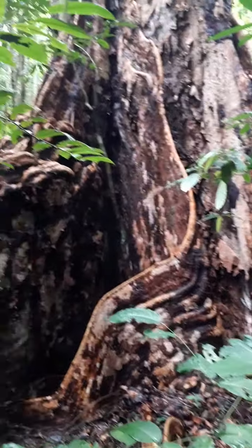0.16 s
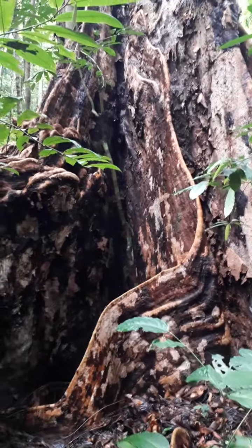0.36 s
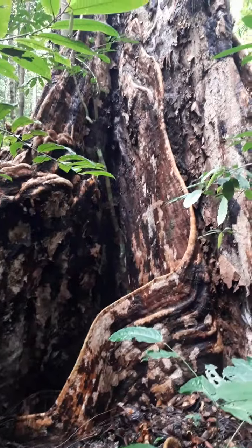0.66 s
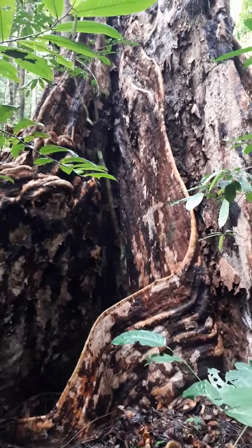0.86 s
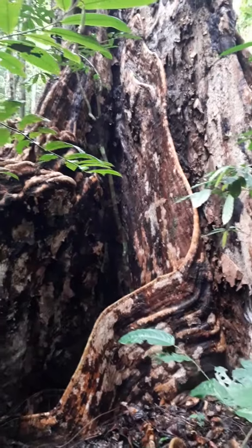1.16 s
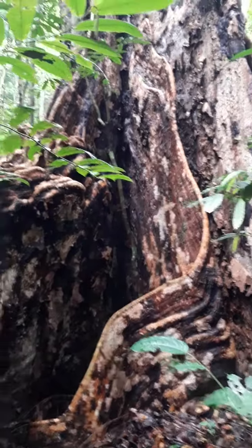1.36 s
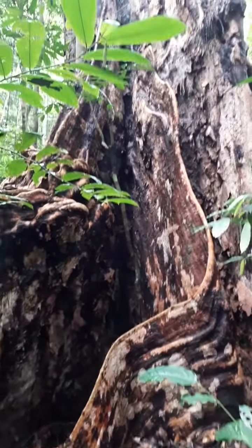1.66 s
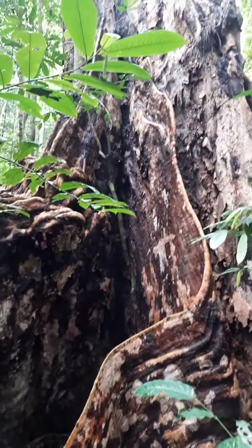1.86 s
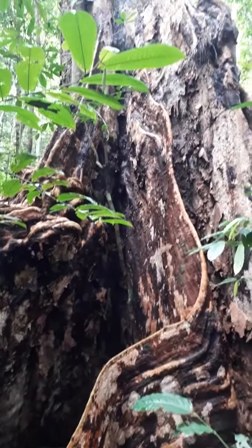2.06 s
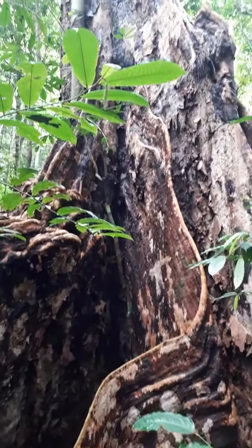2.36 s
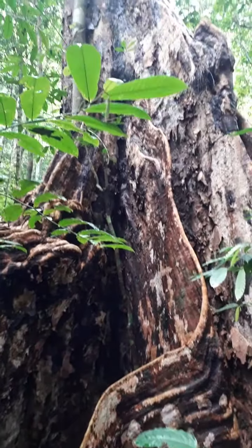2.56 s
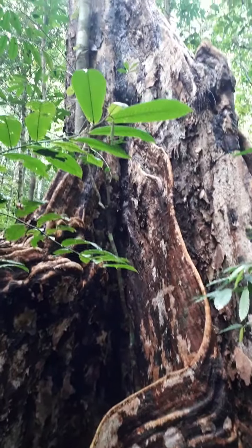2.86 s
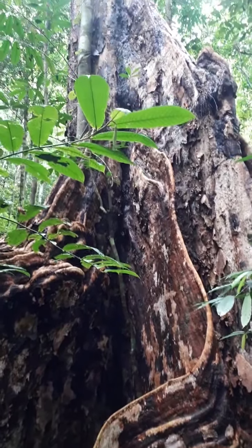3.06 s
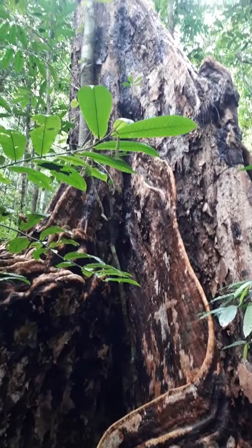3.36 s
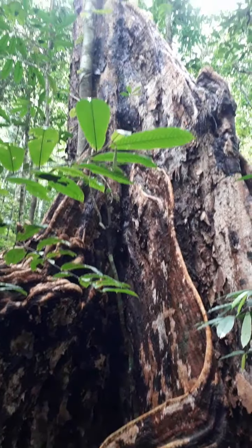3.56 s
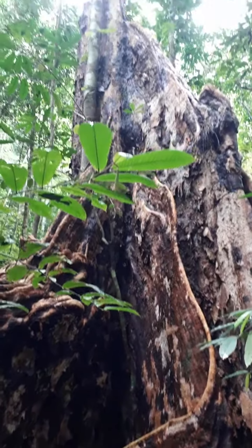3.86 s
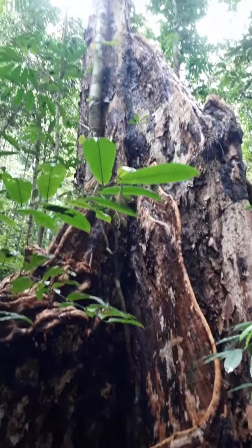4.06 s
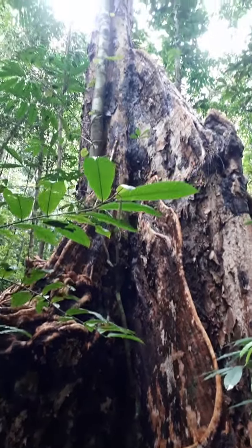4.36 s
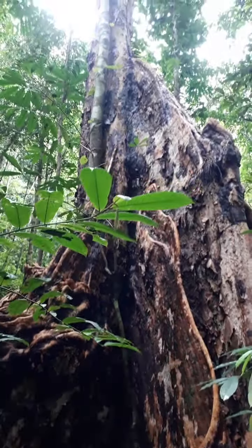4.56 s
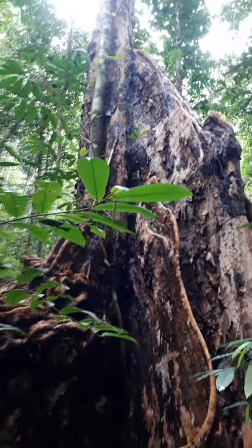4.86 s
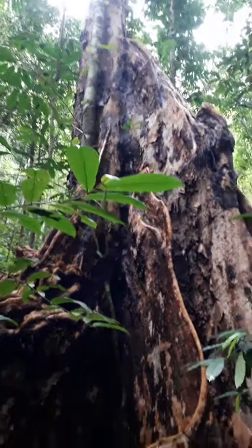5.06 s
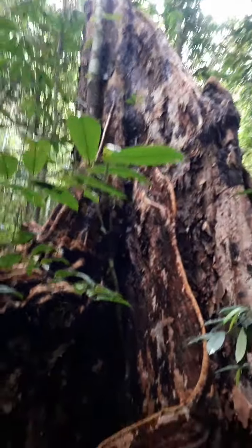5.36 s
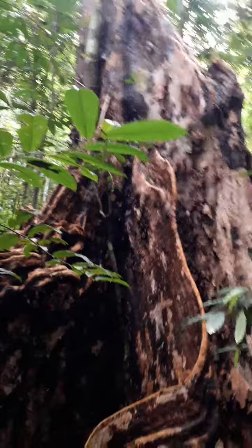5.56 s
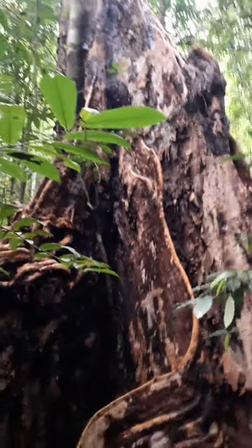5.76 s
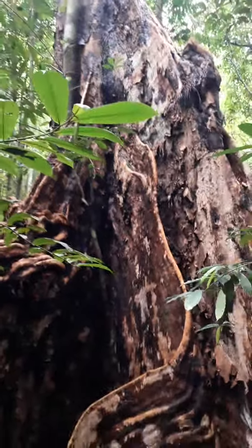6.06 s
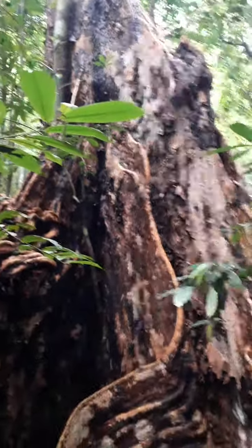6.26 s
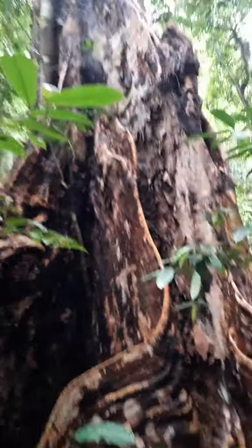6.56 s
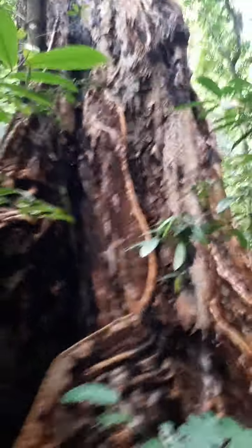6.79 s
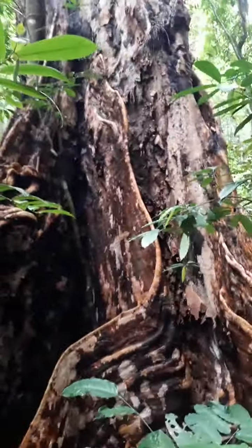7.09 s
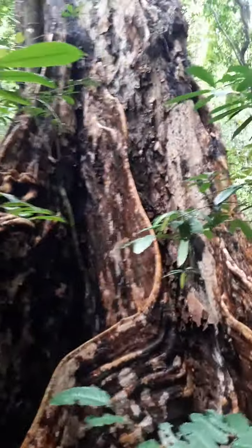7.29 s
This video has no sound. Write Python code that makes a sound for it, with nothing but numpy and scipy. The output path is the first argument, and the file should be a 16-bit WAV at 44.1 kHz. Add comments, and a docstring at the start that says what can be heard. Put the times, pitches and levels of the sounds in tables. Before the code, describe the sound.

In a tropical forest by day, a near cricket trills in rapid buzzing bouts over two shrill bands of distant insects. Close to the microphone, twigs snap sharply in the first two seconds and again near four; a quieter middle follows. Toward the end feet crunch dry, damp leaf litter and a stick breaks loudly. Thin falling chirps sit behind. The picture is almost mono.

```python
"""A near cricket trills in bouts: short wing-stroke notes swell, hold and break off in a tropical forest by day.
Feet shift in leaf litter: clumped fractures make the crackle, filtered bursts the twigs, resonances one stick.
Falling chirps, peeps and dry rasps sit behind, over two far insect bands and air made of coloured noise.
Decaying noise tails stand for scatter from trunks and leaves; two close ports give a nearly mono picture."""
import sys
import numpy as np
from scipy import signal
from scipy.fft import rfft, irfft, next_fast_len
from scipy.io import wavfile

SR = 44100
rng = np.random.default_rng(int(sys.argv[2]) if len(sys.argv) > 2 else 0)


def store_pcm(level_fs):
    """Save levels as 16-bit WAV."""
    pcm = np.round(np.clip(level_fs, -1, 1) * 32767).astype(np.int16)
    wavfile.write(sys.argv[1], SR, np.atleast_2d(pcm).T)


N = 327663
TIME = np.arange(N) / SR

# Bouts of the near cricket. Each row: first stroke in seconds, end in seconds, swell in seconds,
# relative level in dB.
CRICKET_BOUTS = [(-.272, .27, 0.08, -65), (0.773, 2.446, 0.092, -61), (2.797, 3.63, .5, -57.5),
                 (3.699, 4.745, 0.07, -57.5), (4.835, 5.03, .06, -61.5), (5.259, 5.818, 0.19, -55.5),
                 (6.214, 6.56, .2, -59), (6.856, 7.28, 0.17, -58)]
STROKES_PER_S, BREAK_OFF_S = 36.52, .03
IDLE_DB = -69   # relative level of the soft wing brushing between bouts

# A foot presses on the litter. Each row: fullest weight in seconds, press time in seconds,
# release time in seconds, relative level of the damp underlayer in dB, of the dry leaves in dB.
FOOT_PRESSES = [(.02, .05, 0.15, -76.5, -71.5), (.23, .07, 0.059, -74, -74), (5.22, 0.045, 0.046, -75, -82),
                (5.5, .06, 0.069, -73, -67.5), (5.6, .055, .065, -73, -56.5),
                (5.645, 0.024, .035, -66.5, -64.5), (6.275, 0.037, .06, -62.5, -60),
                (6.44, .06, 0.069, -68.5, -62.5), (6.585, 0.023, 0.033, -58, -70),
                (6.8, 0.17, 0.058, -70, -66), (7.19, 0.1, 0.15, -73.5, -63),
                (7.33, 0.061, 0.08, -68, -68.5)]
# Colour of the damp layer under the leaves. Each row: frequency in Hz, relative level in dB per Hz.
UNDERLAYER_SPECTRUM = [(60, -15.5), (200, -10.5), (450, -4.5), (750, -1), (1250, 1), (1700, -16),
                       (2600, -24)]
# Colour of the sliding dry leaves. Each row: frequency in Hz, relative level in dB per Hz.
LEAF_SPECTRUM = [(700, -18), (1400, -4), (2000, -6.5), (2700, -6), (3700, -1), (6000, -8.5), (8700, 1.5),
                 (10500, -10), (12700, -3.5), (16000, -12.5)]

# Twigs and dry leaves snapping. Each row: start in seconds, tearing time scale in seconds, body in Hz,
# body level in dB, crack in Hz, crack level in dB, splinter level in dB.
TWIG_SNAPS = [(0.0284, 0.0033, 1990, -72, 5070, -56, -68), (.109, 0.0037, 1050, -72, 5660, -56, -72),
              (0.2107, 0.0028, 1380, -64.5, 6940, -51, -62), (.7371, .0012, 1260, -79, 5360, -62, -83),
              (0.7982, 0.0042, 1050, -68.5, 1190, -68, -90), (.985, 0.0028, 1100, -55.5, 7300, -44, -51.5),
              (1.149, 0.0063, 684, -63, 3000, -53.5, -55), (1.1525, 0.0047, 1000, -70, 6600, -46, -57),
              (1.585, 0.003, 1360, -67.5, 4470, -75.5, -74), (1.79, 0.0031, 1050, -49, 6550, -40, -60),
              (1.7931, 0.0023, 1800, -51, 5800, -49, -60), (2.122, .002, 1070, -66, 7300, -54, -64),
              (2.1488, 0.0021, 1070, -67, 6200, -54.5, -63), (3.756, 0.0033, 1870, -72, 3000, -87, -91),
              (3.849, 0.0012, 2200, -56, 5400, -46, -66), (3.8526, 0.0037, 840, -54, 5400, -40, -51),
              (3.867, 0.0035, 870, -58, 4650, -53, -56), (3.879, .0029, 915, -60.5, 4900, -53, -59),
              (6.2804, 0.0028, 1100, -57, 5200, -64, -63), (6.3825, .0065, 3100, -50, 6000, -47.5, -47),
              (6.539, 0.0021, 836, -59, 5350, -53, -60.5), (6.731, 0.0063, 1476, -43.5, 6270, -37.5, -44),
              (6.7442, 0.0039, 1560, -51.5, 4880, -46, -51), (7.1294, 0.001, 1755, -54, 4350, -60, -57),
              (7.161, .0022, 2000, -48, 5400, -42.5, -44), (7.297, .0012, 1890, -51.5, 990, -56.5, -75)]
SNAP_ECHO_DB = -9.5   # level of the burst spread by the undergrowth, relative to the snap

# Resonances of the breaking stick. Each row: frequency in Hz, width in Hz, relative level in dB.
STICK_RESONANCES = [(270, 370, -20.5), (1584, 530, -5.5), (2950, 310, -12.5), (3800, 244, -15),
                    (5190, 900, -0.5), (8000, 1600, -12), (10500, 440, -26.5), (15200, 700, -21.5)]
STICK_S, STICK_DB = 6.7368, 19   # start in seconds, drive in dB
TAP_S, TAP_DB = 4.8801, -4.5   # tap on the microphone's housing: start in seconds, drive in dB
# Soft thumps. Each row: start in seconds, drive in dB, frequency in Hz, 60 dB decay in seconds.
SOFT_THUMPS = [(.915, -62.5, 110, 0.051), (4.869, -51, 139, 0.057), (4.8872, -40, 380, 0.0061),
               (4.889, -35, 142, 0.032), (5.652, -60, 125, .05), (6.714, -56, 169.4, 0.028)]

# Thin falling chirps. Each row: start in seconds, starting pitch in Hz, relative level in dB.
CANOPY_CHIRPS = [(.51, 13300, -77), (.83, 14900, -73), (.87, 13700, -67), (1.41, 13700, -69),
                 (2.63, 14200, -71), (2.88, 14150, -72), (3.2, 14200, -70), (3.41, 13900, -61),
                 (3.59, 14200, -71), (3.97, 14500, -67.5), (4.44, 14400, -71), (4.85, 14700, -69),
                 (5.15, 14200, -69.5), (5.21, 13200, -72), (5.37, 15400, -68), (5.92, 13650, -68)]
CHIRP_S, CHIRP_FALL_HZ = .048, 420
PEEP_START_S, PEEP_EVERY_S = 4, 0.24
PEEP_S, PEEP_HZ, PEEP_FALL_HZ, PEEP_DB = .04, 7600, 159, -69   # level is the centre of a random spread
# Faint level calls from deep in the forest. Each row: start in seconds, pitch in Hz, relative level in dB.
DEEP_CALLS = [(.04, 1315, -75), (.1, 3560, -73), (2.12, 1345, -81.5), (3.25, 3730, -77), (5.8, 3540, -77)]
DEEP_CALL_S = 0.19

# Dry insect rasps. Each row: start in seconds, length in seconds, relative level in dB, direct share from 0 to 1.
INSECT_RASPS = [(1.063, 0.1, -62, 0.4), (2.694, 0.051, -45.5, 1.0), (4.879, 0.038, -49.5, 0.45)]
# Colouring of the rasp's tooth clicks. Each row: frequency in Hz, gain in dB.
RASP_COLOUR = [(5500, -30), (7000, -17), (8300, -3.5), (9200, -1), (10300, -12.5), (11500, -21),
               (14000, -22), (16000, -39)]

# Song of the lower far insects. Each row: frequency in Hz, relative level in dB per Hz.
LOW_CHOIR_SPECTRUM = [(4200, -36), (4620, -26.5), (4780, -13), (5250, -3), (5400, -3), (5550, -2.5),
                      (5900, -9.5), (6400, -29.5), (6800, -44.5)]
LOW_CHOIR_DB, LOW_CHOIR_DB_PER_S, LOW_CHOIR_SWAY_DB = -62.3, -.3, 0.37   # sinks slowly
# Song of the higher far insects. Each row: frequency in Hz, relative level in dB per Hz.
HIGH_CHOIR_SPECTRUM = [(6600, -27.5), (7100, -8.5), (7450, -9.5), (7800, -2), (8000, -6), (8300, -16),
                       (8800, -13.5), (9300, -33.5)]
# Slow level course of the high choir. Each row: time in seconds, relative level in dB.
HIGH_CHOIR_COURSE = [(0, -74), (.45, -68), (.9, -75), (1.9, -66.5), (2.6, -73.5), (3.0, -68.5), (4.2, -73),
                     (4.9, -70), (5.5, -70.5), (6.5, -67), (7.43, -72)]
WHINE_DB, WHINE_SWAY_DB, WHINE_SWAY_HZ = -77, 3, 2.5   # a far cricket on one thin note

# Forest background noise. Each row: frequency in Hz, relative level in dB per Hz.
AIR_SPECTRUM = [(25, -12.5), (55, -2.5), (90, 2.5), (130, 5), (200, -3.5), (350, -7), (700, -10),
                (1300, -10), (2400, -13), (4200, -10.5), (9500, -18.5), (12500, -12.5), (14000, -11.5),
                (16000, -10.5)]
# Decay of the forest's tail at a stretch of 1. Each row: frequency in Hz, 60 dB decay in seconds.
FOREST_DECAY = [(100, 0.22), (600, 0.4), (1400, 0.34), (4000, 0.58), (9000, 0.34), (16000, 0.46)]
# Noise that differs between the ports. Each row: frequency in Hz, relative level in dB per Hz.
PORT_HISS_SPECTRUM = [(25, 6.5), (120, 10), (220, 1.5), (1200, -1), (2600, -9), (5000, 0.5), (8500, -4.5),
                      (13000, 0.5), (16000, -0.5)]
PORT_HISS_DB, PORT_MISMATCH_DB = -81, -55.5
CUTOFF_HZ = 15900


def cricket():
    """The near cricket restarts its wing beat with every bout and presses harder as the bout swells."""
    first_s, effort = np.zeros(N), np.zeros(N)
    for start, end, swell_s, db in CRICKET_BOUTS:
        first_s[TIME >= start - .5 / STROKES_PER_S] = start
        swell = np.sqrt(np.clip((TIME - start) / swell_s, 0, 1))
        break_off = np.clip((end - TIME) / BREAK_OFF_S, 0, 1)
        effort += from_db(db) * swell * break_off
    song = from_db(-3.6) * np.hypot(effort, from_db(IDLE_DB)) * trill(first_s, STROKES_PER_S)
    return song + from_db(-11) * forest(song, stretch=1.2)


def trill(first_s, strokes_per_s, wing_hz=5400, glide_hz=330, stroke_width=0.12, rasp_db=-10.5):
    """Each wing stroke is a short note that starts sharp and settles near the wing's resonance; rms 1."""
    count = (TIME - first_s) * strokes_per_s
    stroke = np.round(count).astype(int)
    within = count - stroke   # -0.5 to 0.5 of a stroke
    strength = from_db(rng.normal(0, 1.3, N // 500))[stroke]
    glide = glide_hz * np.clip(-within / stroke_width - .4, 0, 3)
    pitch = wing_hz + glide + 25 * drift(59.0)
    note = np.sin(2 * np.pi * np.cumsum(pitch) / SR) * np.exp(-.5 * (within / stroke_width) ** 2)
    # the scraper bites the file just before mid-stroke
    bite = np.exp(-.5 * ((within + 0.13) / 0.037) ** 2)
    catch = rms_one(band(rng.standard_normal(N), 4850, 6200, order=4)) * bite
    return rms_one(strength * (note + from_db(rasp_db) * catch))


def footsteps():
    """A sole presses dry leaves into the damp layer under them; they slide with a swish and a few crack."""
    damp, dry = np.zeros(N), np.zeros(N)
    for s, press_s, release_s, damp_db, dry_db in FOOT_PRESSES:
        unloading = np.where(TIME < s, ((s - TIME) / press_s) ** 2, (TIME - s) / release_s)
        weight = np.exp(-unloading.clip(0, 30))
        damp = np.hypot(damp, from_db(damp_db) * weight)
        dry = np.hypot(dry, from_db(dry_db) * weight)
    wet_grains = colour(crackle(per_s=2400, size_db=3.0, clump_db=3.0), UNDERLAYER_SPECTRUM)
    press = from_db(-.5) * damp * rms_one(wet_grains)
    leaf_grains = colour(crackle(per_s=7000, size_db=3.8, clump_db=2.3), LEAF_SPECTRUM)
    swish = from_db(3.5) * rms_one(leaf_grains)
    cracks = from_db(-2.0) * rms_one(band(crackle(per_s=200, size_db=3.3, clump_db=0.5), 1400, 6500))
    litter = press + dry * (swish + cracks)
    return litter + from_db(-13.0) * forest(litter, stretch=1.1)


def crackle(per_s, size_db, clump_db):
    """Tiny fractures at random instants, with uneven sizes that grow and shrink in clumps."""
    born = rng.random(N) < per_s / SR
    own_db = size_db * np.minimum(rng.exponential(1, N), 4)
    shared_db = clump_db * np.clip(drift(64), -2, 2)
    return born * from_db(own_db + shared_db) * rng.choice([-1, 1], N)


def snaps(body_width=1.46, crack_width=1.38, scatter_s=0.012, bending_db=-6.5):
    """Tearing fibres sound the body, a sharp crack and fine splinters; undergrowth spreads each burst."""
    direct, scattered = np.zeros(N), np.zeros(N)
    for s, tear_s, body_hz, body_db, crack_hz, crack_db, splinter_db in TWIG_SNAPS:
        parts = [(body_hz / body_width, body_hz * body_width, body_db),
                 (crack_hz / crack_width, crack_hz * crack_width, crack_db),
                 (9500, 16000, splinter_db),
                 (2.0 * body_hz, 3.7 * body_hz, body_db + bending_db)]   # the body's next bending mode
        for out, length, path_db in [(direct, tear_s, 0), (scattered, scatter_s, SNAP_ECHO_DB)]:
            for low_hz, high_hz, db in parts:
                # each part is driven by fibres of its own; its energy equals 10 ms at rms 1 before the level
                part = band(burst(length, uneven_db=2.5), low_hz, high_hz)
                add(out, s, from_db(db + path_db) * part * np.sqrt(SR / 100) / np.linalg.norm(part))
    return direct + from_db(-3) * scattered + from_db(-2.0) * forest(scattered, stretch=0.83)


def burst(length, uneven_db):
    """A quick run of tiny uneven fractures that swells and dies."""
    t = TIME[:SR // 12]
    fibres = rng.standard_normal(len(t)) * from_db(uneven_db * rng.standard_normal(len(t)))
    return fibres * (t / length) * np.exp(-2.4 * t / length) + 1e-18


def stick():
    """One stick gives way at once: a single sharp release briefly rings its broad resonances."""
    release = signal.unit_impulse(SR // 10) + 1e-18
    out = np.zeros(N)
    for hz, width_hz, db in STICK_RESONANCES:
        resonance = band(release, max(hz - width_hz / 2, 40), hz + width_hz / 2)
        add(out, STICK_S, from_db(STICK_DB + db) * resonance)
    return out + from_db(-33.0) * forest(out, stretch=0.74)


def tap():
    """Something taps the microphone's housing: a band-passed impulse, almost without echo."""
    out = np.zeros(N)
    tick = band(signal.unit_impulse(SR // 10) + 1e-18, 2500, 5600)
    add(out, TAP_S, from_db(TAP_DB) * tick)
    return out + from_db(-23.5) * forest(out, stretch=0.39)


def thumps():
    """Dull bumps: struck modes that die quickly."""
    out = np.zeros(N)
    for s, db, hz, t60 in SOFT_THUMPS:
        add(out, s, from_db(db) * ring(hz, t60))
    out = band(out, 50, 1300)   # a soft contact has no sharp edge
    return out + from_db(-19) * forest(out, stretch=0.69)


def ring(hz, t60):
    """A struck mode: pressure follows the velocity of a decaying sine, so it starts with a step."""
    t = TIME[:SR // 8]
    motion = np.sin(2 * np.pi * hz * t) * from_db(-60 * t / t60)
    return np.diff(motion) / (2 * np.sin(np.pi * hz / SR))


def callers(uneven_db=3.5):
    """High chirps in the canopy, an even series of peeps and a few faint, level calls far off."""
    series = [(s, PEEP_HZ, PEEP_DB + uneven_db * rng.standard_normal())
              for s in PEEP_START_S + PEEP_EVERY_S * np.arange(16)]
    canopy = chirps(CANOPY_CHIRPS, CHIRP_S, CHIRP_FALL_HZ, spread_hz=340, direct_db=-1.0, echo_db=-1.0)
    peeps = chirps(series, PEEP_S, PEEP_FALL_HZ, spread_hz=60, direct_db=.5, echo_db=-4.0)
    far = chirps(DEEP_CALLS, DEEP_CALL_S, 0, spread_hz=390, direct_db=-3.0, echo_db=-9.0)
    return canopy + peeps + far


def chirps(calls, length, fall_hz, spread_hz, direct_db, echo_db):
    """Calls of one shape glide down by fall_hz, smeared in pitch, and also sound through the forest's tail."""
    pitch, level = np.zeros(N), np.zeros(N)
    u = np.linspace(0, 1, int(length * SR))
    for s, start_hz, db in calls:
        add(level, s, from_db(db) * np.sqrt(np.abs(np.sin(np.pi * u))))
        i = max(0, round(s * SR))
        pitch[i:i + len(u)] = (start_hz - fall_hz * u)[:max(0, N - i)]
    turn = 2 * np.pi * np.cumsum(pitch) / SR
    song = level * (drift(spread_hz) * np.cos(turn) + drift(spread_hz) * np.sin(turn))
    return from_db(direct_db) * song + from_db(echo_db) * forest(song, stretch=1.1)


def rasps(teeth_per_s=950):
    """A file is dragged over a scraper: a swelling run of uneven tooth clicks that hangs in the trees."""
    rate = teeth_per_s * (1 + 0.44 * drift(500))
    teeth = np.diff(np.floor(np.cumsum(rate) / SR), prepend=0)
    clicks = teeth * from_db(2.3 * drift(300)) + 0.071 * rng.standard_normal(N)
    buzz = rms_one(colour(clicks, RASP_COLOUR))
    sent, direct = np.zeros(N), np.zeros(N)
    for s, length, db, share in INSECT_RASPS:
        u = np.linspace(0, 1, int(length * SR))
        swell = from_db(db) * (0.62 + 0.87 * u) * signal.windows.tukey(len(u), .1)
        add(sent, s, swell)
        add(direct, s, share * swell)
    return buzz * direct + from_db(-7.5) * forest(buzz * sent, stretch=2.2)


def chorus():
    """Many far insects merge into two shrill noise bands and a few wavering notes."""
    low = from_db(LOW_CHOIR_DB + LOW_CHOIR_DB_PER_S * TIME + LOW_CHOIR_SWAY_DB * drift(1.5))
    course_s, course_db = np.transpose(HIGH_CHOIR_COURSE)
    high = from_db(np.interp(TIME, course_s, course_db)) * from_db(0.68 * drift(6.9))
    low_choir = from_db(-3.5) * coloured_noise(LOW_CHOIR_SPECTRUM)
    low_choir += from_db(-6.5) * wavering_note(5400, width_hz=41)
    high_choir = from_db(-1.4) * coloured_noise(HIGH_CHOIR_SPECTRUM)
    high_choir += from_db(-8.5) * wavering_note(7800, width_hz=110)
    whine_db = WHINE_DB + WHINE_SWAY_DB * np.clip(drift(WHINE_SWAY_HZ), -2, 1.5)
    whine = from_db(whine_db) * wavering_note(7055, width_hz=41)
    return low * low_choir + high * high_choir + whine


def wavering_note(hz, width_hz):
    """A note smeared by many paths through the trees; rms 1."""
    turn = 2 * np.pi * hz * TIME
    return rms_one(drift(width_hz) * np.cos(turn) + drift(width_hz) * np.sin(turn))


def forest_air():
    """The steady forest background: coloured noise."""
    return from_db(-73.5) * coloured_noise(AIR_SPECTRUM)


def forest(x, stretch):
    """Scatter from trunks and leaves: a dense noise tail of unit energy, each band with its own decay."""
    t, edges = TIME[:SR], np.geomspace(80, 17000, 10)
    tail = np.zeros(SR)
    for low_hz, high_hz in zip(edges, edges[1:]):
        t60 = stretch * at_hz(FOREST_DECAY, np.sqrt(low_hz * high_hz))
        tail += band(rng.standard_normal(SR), low_hz, high_hz) * from_db(-60 * t / t60)
    tail = tail * (1 - np.exp(-t / 0.0025))   # scatter builds up over milliseconds
    return signal.fftconvolve(x, tail / np.linalg.norm(tail))[:N]


def from_db(db):
    """Decibels to gain."""
    return 10 ** (np.asarray(db) / 20)


def rms_one(x):
    """Scale to rms 1."""
    return x / np.sqrt(np.mean(x ** 2) + 1e-20)


def at_hz(points, hz):
    """Read a curve on a log-frequency axis."""
    f, value = np.transpose(points)
    return np.interp(np.log(hz + 1e-3), np.log(f), value)


def colour(x, spectrum):
    """Filter a sound by a spectrum that falls steeply past its ends."""
    size = next_fast_len(N)
    hz = np.fft.rfftfreq(size, 1 / SR) + 1e-3
    past_ends = np.minimum(1, np.minimum(hz / spectrum[0][0], spectrum[-1][0] / hz)) ** 6
    return irfft(rfft(x, size) * from_db(at_hz(spectrum, hz)) * past_ends, size)[:N]


def coloured_noise(spectrum):
    """Steady random noise with a given spectrum; rms 1."""
    return rms_one(colour(rng.standard_normal(N), spectrum))


def drift(rate):
    """Smooth random wander of rms 1: low-passed noise, made at every 20th sample; rate in Hz."""
    r = np.exp(-40 * np.pi * rate / SR)
    noise = rng.standard_normal(N // 20 + 4002)
    slow = signal.lfilter([1], [1, -2 * r, r * r], noise)[4000:]   # drop the filter's start-up
    return np.interp(np.arange(N) / 20, np.arange(len(slow)), rms_one(slow))


def band(x, low_hz, high_hz, order=2):
    """Causal band-pass."""
    sos = signal.butter(order, [low_hz, min(high_hz, .48 * SR)], "band", fs=SR, output="sos")
    return signal.sosfilt(sos, x)


def add(out, s, sound):
    """Mix a sound in at time s."""
    i = max(0, round(s * SR))
    out[i:i + len(sound)] += sound[:max(0, N - i)]


def scene():
    """Insects, feet and air reach two closely spaced ports that differ by hiss and a slight phase mismatch."""
    near = snaps() + stick() + tap() + thumps() + footsteps()
    mid = cricket() + near + callers() + rasps() + chorus() + forest_air()
    hiss = from_db(PORT_HISS_DB) * coloured_noise(PORT_HISS_SPECTRUM)
    mismatch = from_db(PORT_MISMATCH_DB) * signal.hilbert(near).imag   # near sounds turned by 90 degrees
    side = hiss + mismatch
    return np.array([mid + side, mid - side])


def record(dry):
    """The top is cut steeply by an elliptic low-pass."""
    return signal.sosfilt(signal.ellip(10, .2, 70, CUTOFF_HZ, fs=SR, output="sos"), dry)


dry = scene()
out = record(dry)
store_pcm(out)
```